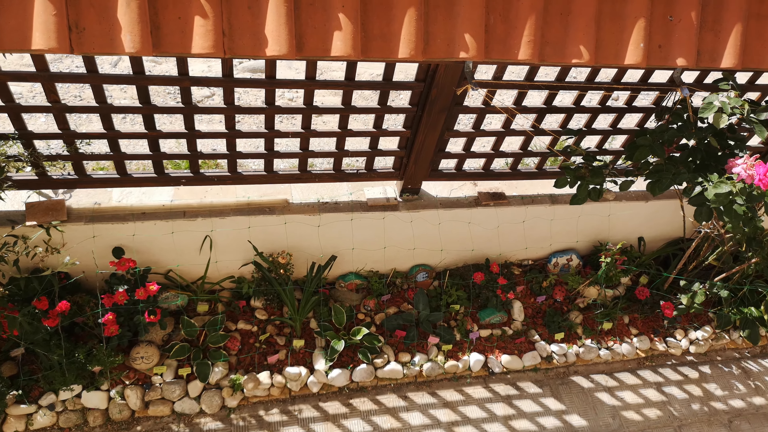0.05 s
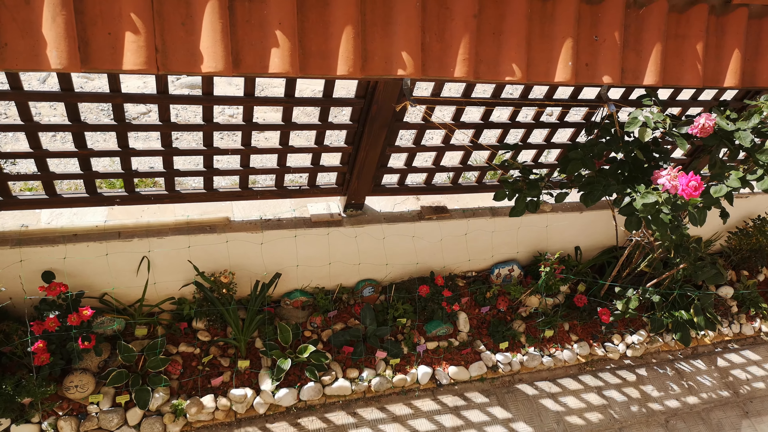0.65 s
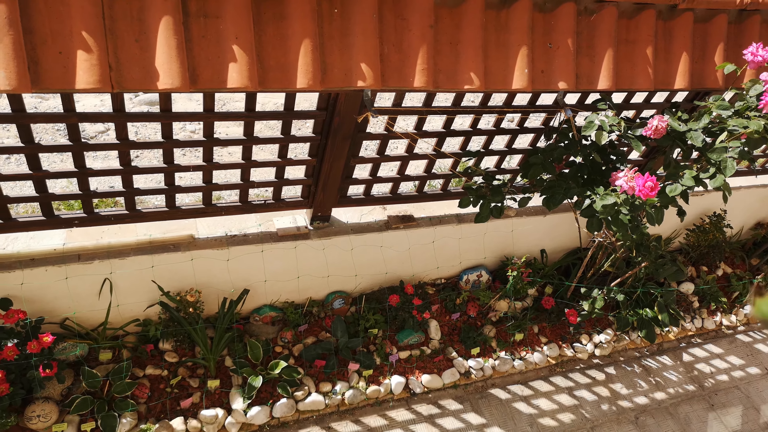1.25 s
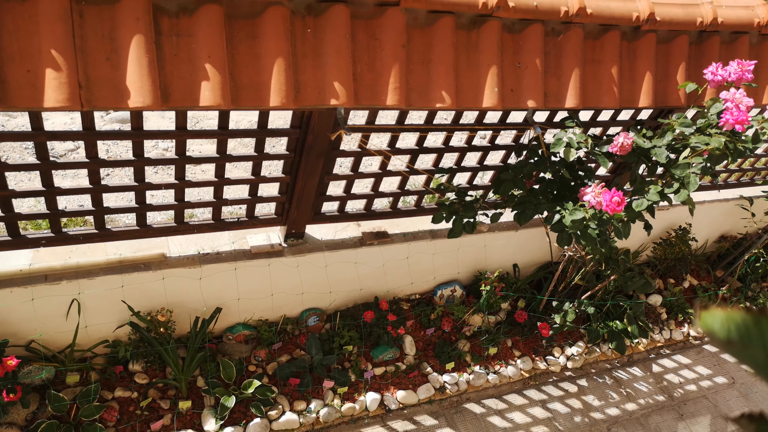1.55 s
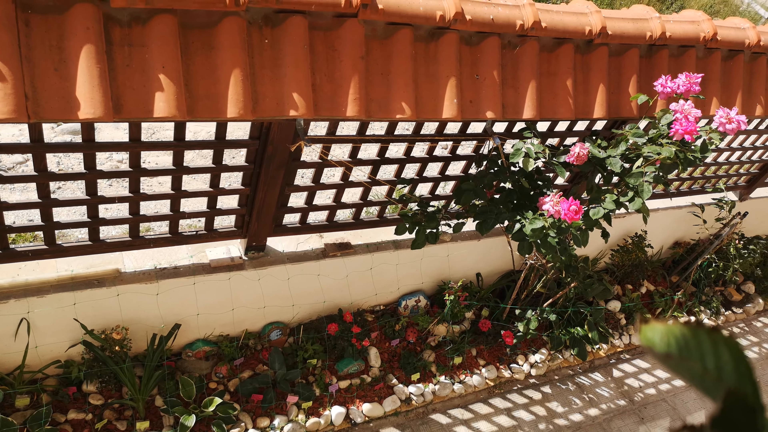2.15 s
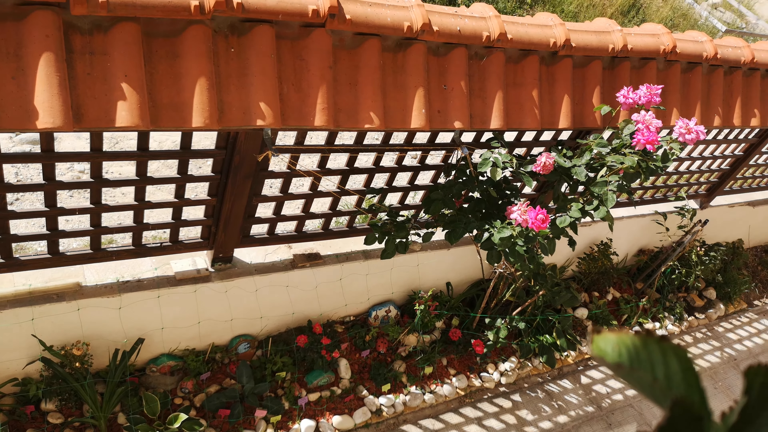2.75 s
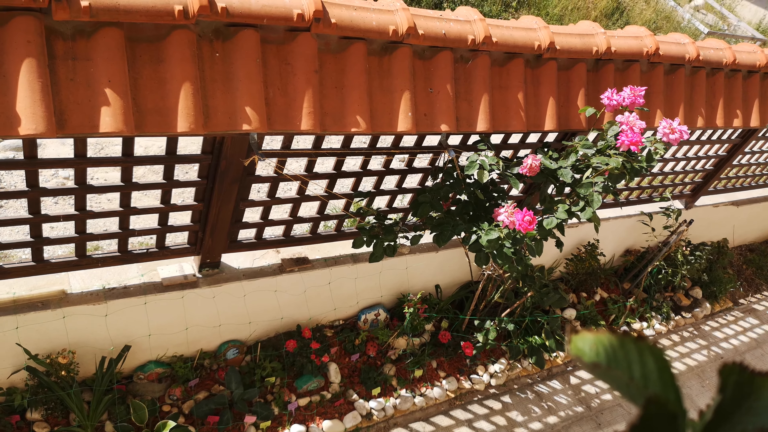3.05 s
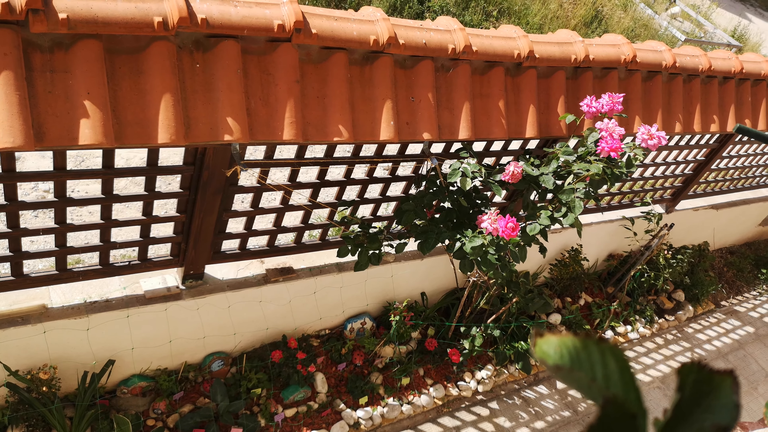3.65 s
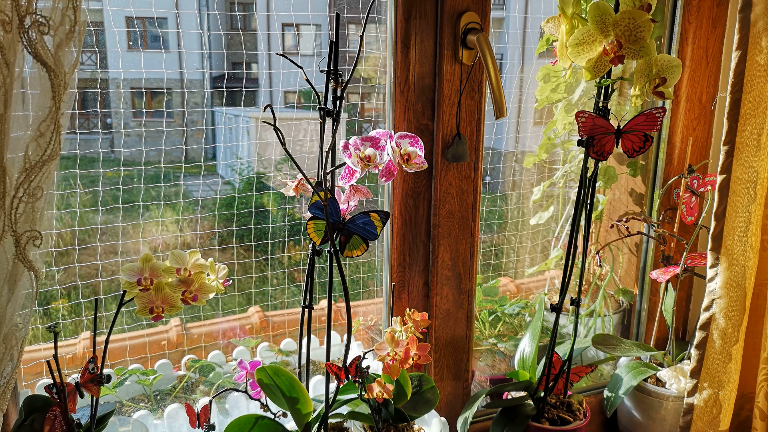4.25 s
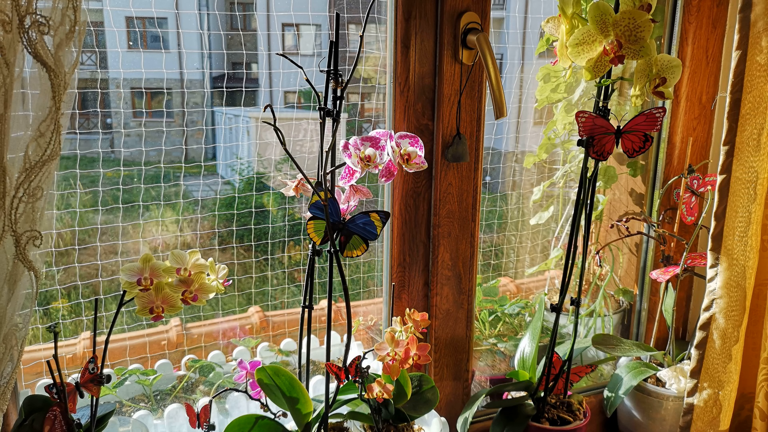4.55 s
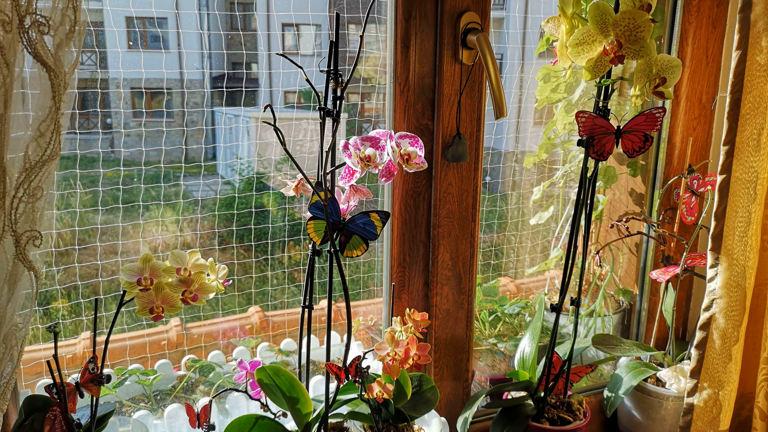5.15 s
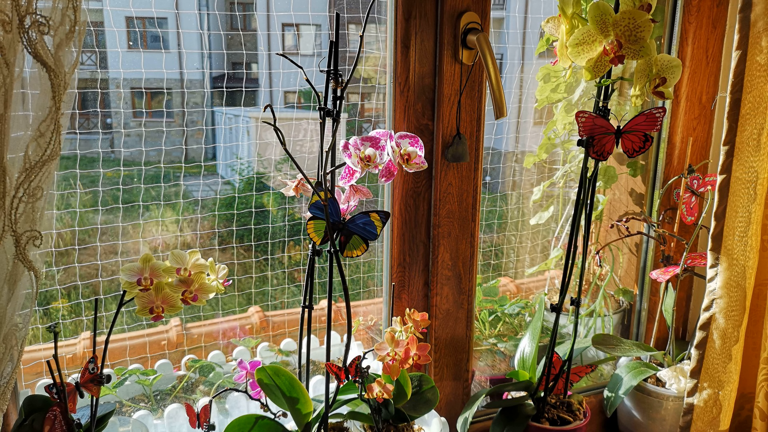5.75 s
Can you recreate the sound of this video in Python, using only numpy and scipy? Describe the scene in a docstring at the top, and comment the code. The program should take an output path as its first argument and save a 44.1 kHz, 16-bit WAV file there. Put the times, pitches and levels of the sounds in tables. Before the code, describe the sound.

A small bird whistles a quick, high seesaw phrase outdoors, about four note pairs a second, clear above everything else. During its pause, faraway birds call and scold faintly, and something small ticks close to the microphone. Then the seesaw song returns. A sparrow chirps now and then throughout. The garden background is soft airy hiss and rumble, with a faint electric hum that drops out when the song resumes.

```python
"""A small songbird, likely a great tit, repeats a low and a high whistle four times a second.
It sings two phrases with its syrinx (a bird's voice box), and house walls throw the notes back
across the garden. Sparrows chirp, other birds call further off, and small bumps and ticks sound nearby.
A faint mains hum, a low rumble and a soft hiss lie underneath; the hum stops and the air turns
quieter just after the second phrase begins."""
import sys
import numpy as np
from scipy import signal
from scipy.fft import rfft, irfft
from scipy.io import wavfile
from scipy.ndimage import map_coordinates

SR = 44100
rng = np.random.default_rng(int(sys.argv[2]) if len(sys.argv) > 2 else 0)


def pcm_store(signal):
    """Save signal as 16-bit PCM."""
    levels = np.round(np.clip(np.atleast_2d(signal), -1, 1) * 32767)
    wavfile.write(sys.argv[1], SR, levels.astype(np.int16).T)


N = 256220
T = np.arange(N) / SR
TOP_HZ = 15800

# The songbird's whistle pairs: (time [s], low level [dB], high level [dB], high whistle's end pitch [Hz])
WHISTLE_PAIRS = [(-.108, -43, -52, 5264), (0.13, -41, -48.5, 5228), (.373, -41, -46.5, 5200),
                 (0.618, -38, -44.5, 5166), (0.866, -41, -48.5, 5230), (1.109, -41.5, -47, 5203),
                 (1.368, -42.5, -51, 5227), (4.084, -50, -64, 5356), (4.346, -44.5, -55.5, 5233),
                 (4.589, -44.5, -55.5, 5284), (4.829, -42.5, -52, 5190), (5.066, -43, -49.5, 5185),
                 (5.303, -42, -50.5, 5194), (5.566, -42, -48.5, 5268)]


def undb(db):
    """Turn decibels into a number to multiply by."""
    return 10 ** (np.asarray(db) / 20)


def unit(x):
    """Scale a sound to an average strength (rms) of 1."""
    return x / np.sqrt(np.mean(x ** 2, axis=-1, keepdims=True))


def pan(db):
    """Left and right gains; db is the left level minus the right."""
    return undb(np.array([[db], [-db]]) / 2)


def add(out, start, x):
    """Mix a stereo sound in at a start time in seconds."""
    i = int(round(start * SR))
    x = x[:, max(-i, 0):N - i]
    out[:, max(i, 0):max(i, 0) + x.shape[1]] += x


def colour(x, points):
    """Shape bass and treble along a curve of (frequency [Hz], gain [dB]) points."""
    hz, db = np.transpose(points)
    freqs = np.fft.rfftfreq(x.shape[-1], 1 / SR)
    gain = undb(np.interp(np.log(freqs + 1), np.log(hz), db))
    return irfft(rfft(x) * gain, x.shape[-1])


def wander(n, rate):
    """A smooth random wobble, about 1 in size, that changes `rate` times a second."""
    place = np.arange(n) * rate / SR
    return map_coordinates(rng.standard_normal(int(place[-1]) + 2), [place], order=2, mode="nearest")


def fade(t, t60):
    """Die away by 60 dB every t60 seconds."""
    return np.exp(-np.log(1000) * t / t60)


def scatter(x, t60, build_s):
    """Many small echoes, different left and right, that build up and die away; as strong as x."""
    t = np.arange(SR * 3 // 4) / SR
    paths = rng.standard_normal((2, len(t))) * (1 - np.exp(-t / build_s)) * fade(t, t60)
    echoes = signal.fftconvolve(x[None], paths, axes=1)
    return echoes * np.sqrt(np.sum(x ** 2) / np.sum(echoes ** 2, axis=1, keepdims=True))


def garden(x, echo_db, t60, build_s, side_db, lag_samples=32):
    """The direct sound, reaching the left a little later, plus echoes from leaves, fence and roof."""
    out = undb(echo_db) * scatter(x, t60, build_s)
    left, right = pan(side_db)
    out[0, lag_samples:lag_samples + len(x)] += left * x
    out[1, :len(x)] += right * x
    return out


def syrinx(hz, waver, second_db, third_db):
    """A bird's voice: a tone with an unsteady pitch and two weaker overtones."""
    phase = 2 * np.pi * np.cumsum(hz * (1 + waver * wander(len(hz), 900))) / SR
    overtones = undb(second_db) * np.sin(2 * phase) + undb(third_db) * np.sin(3 * phase)
    return np.sqrt(2) * (np.sin(phase) + overtones)


def swell(t, attack_s, release_s, growth_db):
    """Loudness of one whistle: it rises, keeps growing while it is held, and falls."""
    rise = np.sin(np.pi / 2 * np.minimum(t / attack_s, 1)) ** 2
    fall = np.sin(np.pi / 2 * np.minimum((t[-1] - t) / release_s, 1))
    return rise * undb(growth_db * (t / t[-1] - .5)) * fall


def low_notes(usual_s=0.067, usual_db=-41, settled_hz=4290, sharp_hz=232.4, settle_s=0.3814):
    """Low whistles, a little higher early in each phrase: (start, pitch, loudness, side) for each."""
    # When each phrase begins; the first is already under way: (time [s])
    phrase_starts = [-0.458, 4.085]
    for start, db, _, _ in WHISTLE_PAIRS:
        age = min(abs(start - opening) for opening in phrase_starts)
        t = np.arange(int(SR * usual_s * 2 ** ((db - usual_db) / 12))) / SR  # 12 dB louder: twice as long
        scoop = 0.3 * np.exp(-t / .003)  # the note slides up from below
        flick = 0.03 * np.exp((t - t[-1]) / 0.0048)  # and flicks up as it ends
        hz = settled_hz + sharp_hz * np.exp(-age / settle_s)
        loudness = undb(db) * swell(t, attack_s=0.019, release_s=0.017, growth_db=4.5)
        side_db = 3 if age < usual_s else -9  # an opening note is louder on the left
        yield start, hz * (1 - scoop + flick), loudness, side_db


def high_notes(delay_s=.09, length_s=.056, slide=.04, side_db=2.5):
    """High whistles that slide down and level out: (start, pitch, loudness, side) for each."""
    t = np.arange(int(SR * length_s)) / SR
    bend = 1 + slide * (1 - t / t[-1]) ** 1.5
    shape = swell(t, attack_s=0.022, release_s=.014, growth_db=3)
    for start, _, db, hz in WHISTLE_PAIRS:
        yield start + delay_s, hz * bend, undb(db) * shape, side_db


def songbird(notes, kind, second_db, third_db, rough, rasp, rustle_db, wall_side_db, echo_db, t60):
    """Sing the low (kind 0) or high (kind 1) whistles; rough walls smear and dull their echoes."""
    # Echoes off house walls: (delay [s], low whistle's gain [dB], high whistle's gain [dB])
    walls = [(0.018, -16, -1), (0.041, -4, -2.5), (0.064, -13.5, -21.5)]
    # Pitch wobble of the low, then the high whistle: (depth [share of pitch], rate [changes per s])
    quivers = [(.003, 150), (.003, 200)]
    depth, rate = quivers[kind]
    treble_cut = signal.butter(2, 8000, fs=SR, output="sos")
    out = np.zeros((2, N))
    for start, hz, loudness, side_db in notes:
        t = np.arange(len(hz)) / SR
        drift = 1 + depth * wander(len(t), rate)
        waver = rough + rasp * np.exp(-t / .003)  # the syrinx rasps as it starts
        bright_db = 2 * rng.standard_normal()  # the beak opens a little differently for each note
        note = loudness * syrinx(hz * drift, waver, second_db + bright_db, third_db + bright_db)
        add(out, start, garden(note, echo_db, t60, build_s=0.009, side_db=side_db))
        onset = note * np.clip(1 - t / .007, 0, 1)  # the first instant scatters into a short rustle
        add(out, start, undb(rustle_db) * scatter(onset, t60=.15, build_s=.02))
        dull = signal.sosfilt(treble_cut, note)
        for delay, *gains_db in walls:
            echo = scatter(dull, t60=0.017, build_s=0.00032)
            add(out, start + delay, undb(gains_db[kind]) * pan(wall_side_db) * echo)
    return out


def mains_hum(hz=100.1, trim_db=-0.9, waver_db=2, octave_db=-17):
    """A low electric hum with a weak overtone, wavering in pitch and loudness."""
    # The hum's slow rise and fall, before trim and waver: (time [s], level [dB])
    hum_levels = [(0.0, -68), (0.07, -64), (1.96, -68), (2.15, -61.5), (2.63, -67), (4.15, -63.5)]
    phase = 2 * np.pi * np.cumsum(hz + 1.013 * wander(N, 6.5)) / SR
    tone = np.sqrt(2) * (np.sin(phase) + undb(octave_db) * np.sin(2 * phase))
    db = np.interp(T, *np.transpose(hum_levels)) + trim_db + waver_db * wander(N, 6.7)
    return tone * undb(db)


def air(spectrum, db):
    """Distant rumble, alike on both sides, under a wide soft hiss."""
    middle, side = rng.standard_normal((2, N))
    side = colour(side, [(40, -24), (100, -15), (200, -6), (380, 1), (650, 3), (1300, 0)])
    left = colour(middle + side, [(700, 0), (2400, -2), (8000, -2), (14000, 0)])
    both = colour(np.array([left, middle - side]), spectrum)
    return unit(both) * undb(db + 0.74 * wander(N, 8.7))


def background(hum_end_s=4.26, blend_s=.08):
    """Hum and air together give way to quieter air alone."""
    # Tone of the air while the hum lasts: (frequency [Hz], gain [dB])
    early_air = [(20, 5.5), (37, 0.5), (55, -1.5), (100, -8.5), (180, -15.5), (300, -23), (600, -31),
                 (1200, -29.5), (2100, -25.5), (3200, -29.5), (5000, -33.5), (8500, -40), (12000, -47),
                 (16000, -45.5)]
    # Tone of the air afterwards: (frequency [Hz], gain [dB])
    late_air = [(20, -1.5), (37, 3), (55, -0.5), (100, -15.5), (180, -17.5), (300, -28), (600, -33.5),
                (1200, -31.5), (2100, -27.5), (3200, -30.5), (5000, -34), (8500, -42.5), (12000, -46),
                (16000, -49.5)]
    early_share = np.clip((hum_end_s - T) / blend_s + .5, 0, 1)
    early = mains_hum() + air(early_air, db=-57)
    late = air(late_air, db=-61)
    return np.sqrt(early_share) * early + np.sqrt(1 - early_share) * late


def bumps():
    """Soft bumps close by: bursts of dull noise that die away quickly."""
    # Each bump: (time [s], level [dB], time to fade by 60 dB [s])
    hits = [(0.255, -44.5, 0.026), (0.896, -56, 0.26), (3.743, -63.5, 0.3), (4.876, -62.5, 0.067)]
    # A bump's dull tone: (frequency [Hz], gain [dB])
    bump_tone = [(60, -10.5), (170, 15.5), (380, 1), (700, -12), (1800, -6.5), (4000, -17.5), (12000, -59)]
    out = np.zeros((2, N))
    t = np.arange(SR // 4) / SR
    rise = 1 - np.exp(-t / .0007)
    for start, db, t60 in hits:
        noise = unit(colour(rng.standard_normal(len(t)), bump_tone))
        add(out, start, undb(db) * pan(0) * noise * rise * fade(t, t60))
    return out


def far_birds(syllable_s=.06):
    """Distant birds sing short runs of sliding notes, heard only as scattered echoes."""
    # Each run: (time [s], length [s], first pitch [Hz], last pitch [Hz], level [dB], harshness [0-1])
    runs = [(0.396, 0.089, 2292, 2142, -61.5, 1), (1.593, 0.16, 3574, 3985, -64.5, 0.32),
            (1.651, 0.15, 5500, 5570, -69.5, 0.1), (1.964, 0.086, 2950, 2673, -63, 0.8),
            (2.098, 0.22, 3400, 3283, -69.5, 0.11), (2.198, 0.2, 5210, 4640, -75, 0.07),
            (3.384, 0.081, 5080, 5200, -72, 0), (3.554, 0.099, 2450, 1955, -66.5, .1),
            (3.742, .07, 2250, 2800, -65.5, 0.2), (3.88, 0.12, 1930, 2000, -68, 0.43)]
    out = np.zeros((2, N))
    for start, length, first_hz, last_hz, db, harsh in runs:
        count = max(1, round(length / syllable_s))
        run_hz = np.linspace(first_hz, last_hz, int(length * SR))
        for k, hz in enumerate(np.array_split(run_hz, count)):
            slide = 1 + .02 * rng.standard_normal() * np.linspace(-1, 1, len(hz))
            quiver = 1 + .022 * wander(len(hz), 250)
            call = syrinx(hz * slide * quiver, waver=harsh * 0.167, second_db=-31, third_db=-39.5)
            echoes = scatter(call * signal.windows.tukey(len(hz), .5), t60=0.7, build_s=0.001)
            add(out, start + k * length / count, undb(db) * pan(-3) * echoes)
    return out


def ticks():
    """Something small and hard is tapped and rings briefly at several high pitches."""
    # Each tick: (time [s], level [dB], left minus right [dB], pitch scale [ratio])
    hits = [(0.478, -64, 2, 0.8), (1.039, -60, -9, 1.46), (3.3387, -44.5, -9, 0.984)]
    # How the object rings at a pitch scale of 1: (frequency [Hz], width [Hz], gain [dB])
    rings = [(2300, 340, -21), (3430, 370, 5.5), (4950, 280, 4), (6400, 630, 9.5), (8000, 420, 7.5),
             (9140, 100, 7.5)]
    out = np.zeros((2, N))
    t = np.arange(SR // 4) / SR
    decay = fade(t, t60=0.025) + undb(-22) * np.exp(-t / 0.019)  # a sharp crack and a faint tail
    for start, db, side_db, ratio in hits:
        crack = rng.standard_normal((2, len(t))) * decay
        tick = np.zeros_like(crack)
        for hz, width, gain_db in rings:
            peak = signal.iirpeak(min(hz * ratio, TOP_HZ), hz / width, SR)
            tick += undb(gain_db) * signal.lfilter(*peak, crack)
        band_hz = [1700 * ratio, min(10000 * ratio, TOP_HZ)]
        tick = signal.sosfilt(signal.butter(2, band_hz, "bandpass", fs=SR, output="sos"), tick)
        tick /= tick[:, :SR // 250].std(axis=1, keepdims=True)  # the first 4 ms set the level
        add(out, start, undb(db) * pan(side_db) * tick)
    return out


def sparrows(length_s=.062, lead_s=0.011, warble_hz=95, warble_depth=0.043):
    """The two sides of a sparrow's syrinx make two rough, warbling voices; a wall repeats each chirp."""
    # Each chirp: (time [s], level [dB], pitch scale [ratio])
    chirps = [(0.665, -54, 1), (1.832, -54, 0.99), (3.169, -54, 1.0), (4.076, -55, 1.02),
              (5.242, -51, 1.024)]
    # The lower voice: (place in the note [0-1], pitch before scaling [Hz], gain [dB])
    low_voice = [(0, 3800, -21), (.07, 4400, -4.5), (.2, 5400, -18.5), (.33, 4210, -14), (.5, 3746, 1),
                 (.68, 3475, -6), (.88, 3110, -14.5), (1, 2714, -10.5)]
    # The upper voice, which starts earlier and ends later: same columns
    high_voice = [(0, 5000, -16.5), (.3, 5500, -9.5), (.6, 5580, -22), (.85, 5700, -16), (1, 5050, -18)]
    out = np.zeros((2, N))
    for start, db, ratio in chirps:
        for shape, lead in ((low_voice, 0), (high_voice, lead_s)):
            places, pitches, gains_db = np.transpose(shape)
            n = int((length_s + 2 * lead) * SR)
            progress = np.linspace(0, 1, n)
            hz = ratio * np.interp(progress, places, pitches)
            loudness = undb(db + np.interp(progress, places, gains_db)) * signal.windows.tukey(n, .06)
            warble = 1 + warble_depth * np.sin(2 * np.pi * (warble_hz * np.arange(n) / SR + rng.random()))
            voice = loudness * syrinx(hz * warble, waver=.04, second_db=-30, third_db=-45)
            heard = garden(voice, echo_db=4.3, t60=0.46, build_s=0.0071, side_db=-8)
            add(out, start - lead, pan(-0.51) * heard)
            wall_echo = undb(-4.5) * scatter(voice, t60=0.5, build_s=0.005)
            add(out, start - lead + 0.036, wall_echo)
    return out


def scolding_bird(length_s=0.031):
    """A distant bird scolds in short, rasping notes that rise and fall in pitch."""
    # Each note: (time [s], pitch near its top [Hz], level [dB])
    scolds = [(2.575, 2500, -64.5), (2.671, 2605, -60), (2.777, 2620, -60)]
    out = np.zeros((2, N))
    arch = np.hanning(int(length_s * SR))
    for start, hz, db in scolds:
        rasp = syrinx(hz * (.9 + .12 * arch), waver=.14, second_db=-5, third_db=-17) * arch
        add(out, start, undb(db) * pan(-6) * scatter(rasp, t60=0.13, build_s=0.00053))
    return out


def scene():
    """All the birds, the ticks and bumps, and the background together."""
    low = songbird(low_notes(), kind=0, second_db=-53, third_db=-44.5, rough=.002, rasp=0.13,
                   rustle_db=20.5, wall_side_db=1.5, echo_db=-6.5, t60=0.4)
    high = songbird(high_notes(), kind=1, second_db=-42, third_db=-61.5, rough=0.0051, rasp=.015,
                    rustle_db=0.5, wall_side_db=0, echo_db=-5.5, t60=0.48)
    return low + high + sparrows() + far_birds() + scolding_bird() + ticks() + bumps() + background()


def record(dry):
    """Cut away the very highest treble."""
    return signal.sosfilt(signal.ellip(10, .1, 70, TOP_HZ, fs=SR, output="sos"), dry)


dry = scene()
out = record(dry)
pcm_store(out)
```